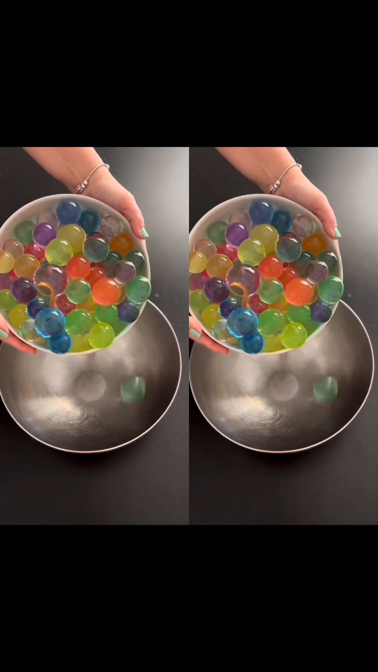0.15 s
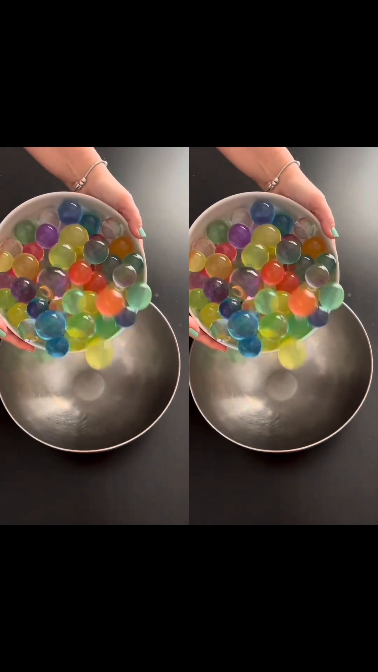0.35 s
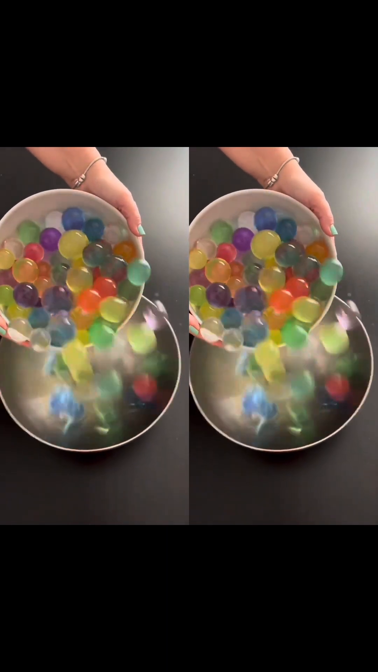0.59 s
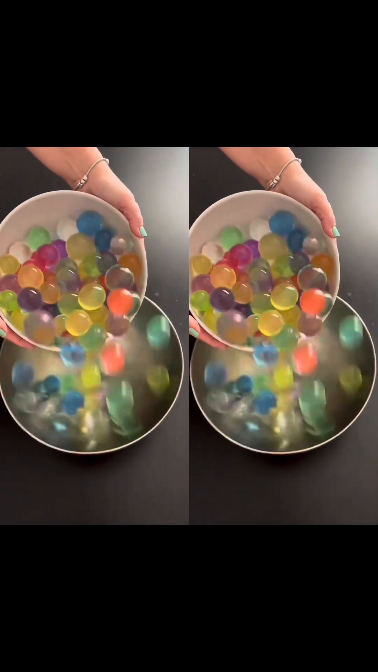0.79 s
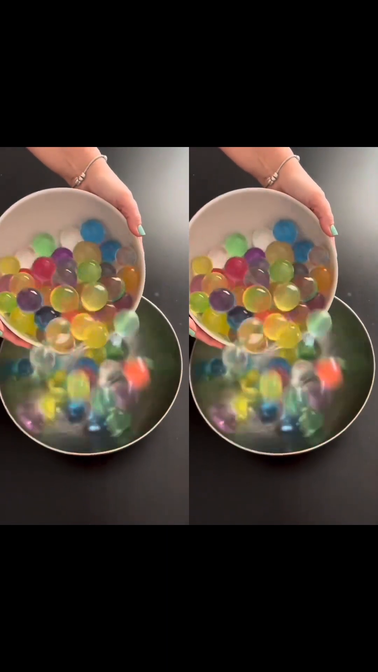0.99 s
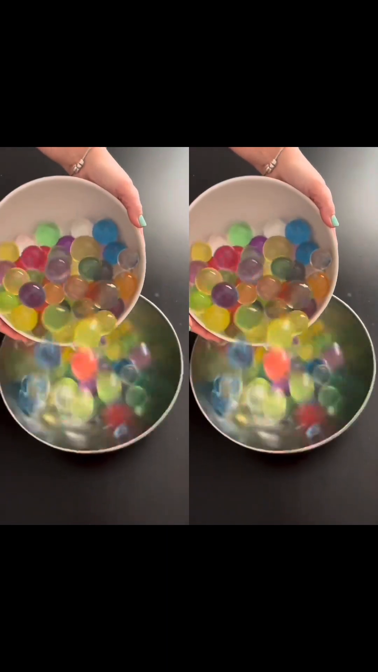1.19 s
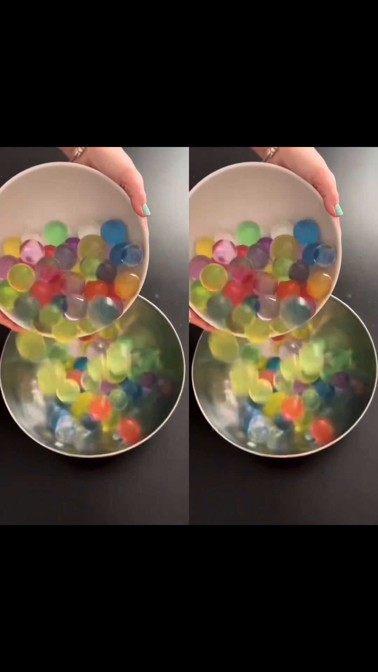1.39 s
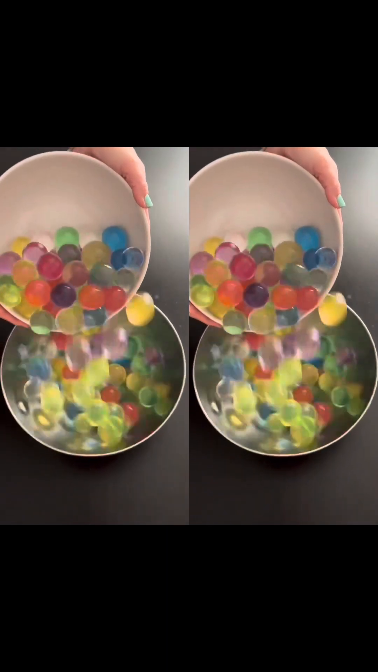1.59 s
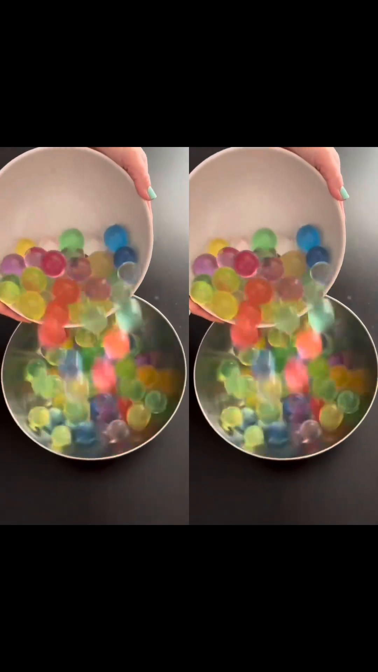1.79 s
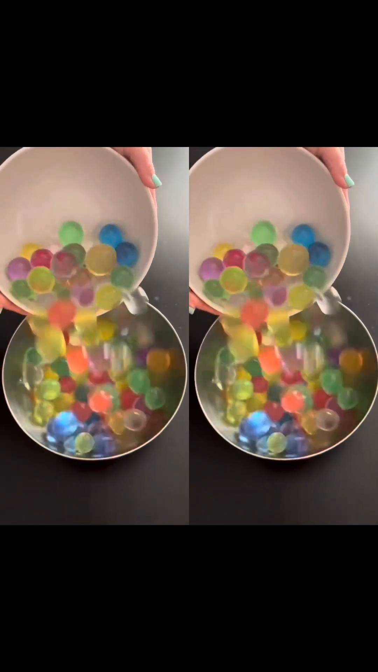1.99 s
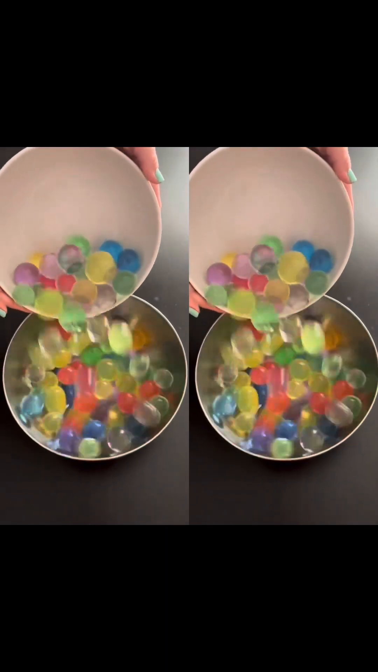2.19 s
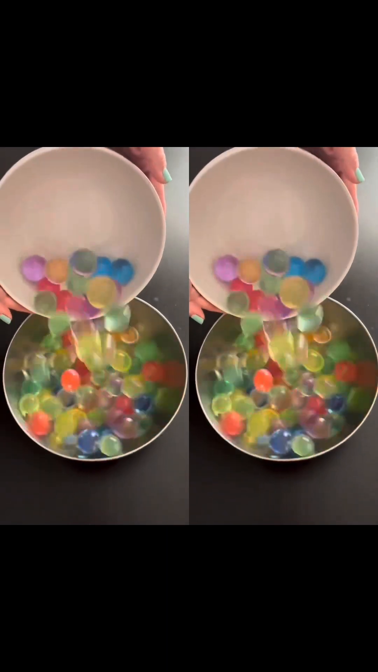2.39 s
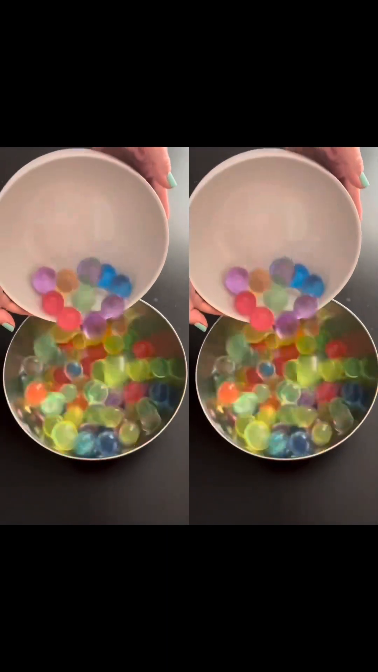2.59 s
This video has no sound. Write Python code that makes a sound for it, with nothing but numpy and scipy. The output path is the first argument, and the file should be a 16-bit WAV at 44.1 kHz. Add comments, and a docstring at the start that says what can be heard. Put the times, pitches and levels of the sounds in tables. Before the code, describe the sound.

Wet gel beads pour into a metal bowl on a table. After faint low hum, single soft thumps begin at 0.1 s. From 0.44 to 0.76 s the pouring bowl's rim rattles loudly on the metal in short, dry clanks. Dull low thuds, wet smacks and crisp patter continue to about 2.6 s, stronger near 1.24 and 1.45 s, with tiny pitched wet ticks from 1.3 s. Close stereo, small room.

```python
"""A faint room hum lies under soft wet gel beads pouring into a metal bowl on a table, in stereo.
From 0.1 s single beads thump or slap bowl and table as decaying modes, over a stream of light landings,
while wet smacks and patter (shaped noise) sound on top. From 0.44 to 0.76 s the pouring bowl's rim
chatters on the metal: clusters of taps excite rim modes. From 1.3 s a few pitched wet ticks appear.
Noise-tail reflections surround the sources, and two close microphone ports pick it all up."""
import sys
import numpy as np
from scipy import signal
from scipy.fft import rfft, irfft, next_fast_len
from scipy.io import wavfile

SR = 44100
rng = np.random.default_rng(int(sys.argv[2]) if len(sys.argv) > 2 else 0)


def unload_audio(sound):
    """Save the sound as a 16-bit wav file, at the path given as the first command line argument."""
    columns = np.transpose(np.atleast_2d(sound))
    # keep every value between -1 and 1, then stretch to whole-number steps
    steps = np.round(np.clip(columns, -1, 1) * 32767)
    wavfile.write(sys.argv[1], SR, steps.astype(np.int16))


N = 116865

# Noise spectrum of the room hum: f/Hz, relative level/dB
HUM_SPECTRUM = [(50, 10.5), (340, -8), (1400, -11.5), (2600, -55)]
# Knocks of the rim: t/s, peak level of the ring/dB, extra treble level/dB
RIM_KNOCKS = [(0.437, -6.5, -2), (0.485, -6.5, -7), (0.493, -11, -0.2), (0.506, -8, 2.5), (0.545, -3, -2.5),
              (0.573, -4.5, 2), (0.605, -13.5, -32), (0.687, -9, -3.1), (0.715, -4, 0), (0.722, -9, 3),
              (0.752, -6.5, 2), (0.763, -9.5, -11)]
# Ringing modes of rim and bowl wall: f/Hz, relative level/dB, t60/s
RIM_MODES = [(420, -7, 0.11), (592, -2, 0.04), (692, -2.5, 0.044), (892, 3.5, 0.031), (945, 9.5, 0.032),
             (1026, -1, 0.039), (1360, 4.5, 0.023), (1830, -5, .03), (2075, 2.5, 0.027), (2379, 5, 0.067),
             (3960, -3, 0.047), (5020, -7, 0.073)]
# Noise spectrum of the knocks' crack: f/Hz, gain/dB
CRACK_SPECTRUM = [(1500, -11.5), (3000, -8.5), (7000, -19.5), (15000, -30.5)]
# Strength of the stream of light beads: t/s, relative thump level/dB, relative wet hiss level/dB
STREAM_LEVELS = [(.1, -58, -72.5), (.4, -33, -77), (.5, -28.5, -48.5), (.95, -29, -47), (1.1, -35.5, -49.5),
                 (1.3, -32, -52.5), (2.101, -28, -54.5), (2.65, -36, -60)]
# Wet smacks: t/s, envelope level before colouring/dB, extra top-end level/dB
WET_SMACKS = [(0.097, -43.5, -5), (0.1942, -40.5, -32), (0.424, -29, -37), (0.8795, -29.5, -37.5),
              (1.0314, -35.5, -25), (1.138, -34.5, -3.5), (1.2218, -29, -10), (1.283, -31.5, -24),
              (1.6278, -27, -12), (1.7673, -27.5, -28), (2.0863, -36.5, -13), (2.2684, -40.5, 6.5),
              (2.4318, -30, -14)]
# Pitched wet ticks: t/s, envelope level/dB, f/Hz
WET_TICKS = [(1.301, -45, 2710), (1.463, -46, 4080), (2.089, -44.5, 4070), (2.513, -39, 3660),
             (2.5533, -46, 3530)]
# Colour of smacks and patter: f/Hz, gain/dB
WET_SPECTRUM = [(900, 11.5), (2500, -4), (4000, -1), (7000, -1), (10000, 0), (14000, 5.5)]
# Single landings, heavy thumps and light slaps:
# t/s, peak level of the ring/dB, extra level of upper modes and slap/dB
SINGLE_LANDINGS = [(0.1, -34, 0.5), (0.194, -22.5, -2), (0.268, -21, -7), (0.394, -29, 2), (0.552, -15, 5),
                   (0.748, -20.5, -6), (0.83, -21, 2.5), (0.949, -24, -4.5), (1.142, -18.5, -5.5),
                   (1.177, -17, -2), (1.238, -13.5, 4), (1.339, -23, 0), (1.429, -32.5, 13),
                   (1.454, -13.5, 2.5), (1.572, -24, 3), (1.687, -24, 4.5), (1.91, -18.5, 1.5),
                   (1.986, -25.5, 7), (2.043, -24.5, 7), (2.074, -30, 9.5), (2.221, -17.5, -1),
                   (2.233, -27, 11), (2.271, -26.5, 10), (2.338, -24.5, -2)]
# Ringing modes of bowl and table: f/Hz, relative level/dB
BODY_MODES = [(105, -10), (135, -1.5), (160, -7), (246, -0.5), (285, -4), (336, -9), (450, -10.5),
              (598, -11.5)]
# Phase lead between the two ports, before the bass is made alike: f/Hz, phase/rad
PORT_LEAD = [(300, -.7), (1200, -.8), (2700, 2.6), (5000, 1.2), (7240, 6.2)]
# Level difference between the two ports, before the bass is made alike: f/Hz, level/dB
PORT_TILT = [(400, 0.5), (1000, -5.5), (2200, -0.5)]

HUM_RMS_DB = -60.5
ROOM_DB, ROOM_T60_S = -8, 0.3
APART = 1  # strength of each port's own tail against the shared one
SPOT_DB = 4  # spread of the mode levels from one contact spot to the next
CHATTER_PER_S, CHATTER_S = 1500, 0.0069  # tap rate and length of one knock's chatter
TREBLE_FROM_HZ, CRACK_T60_S = 1800, 0.038
SMACKS_PER_S, SMACK_SPREAD_DB = 600, 4.5  # small ticks of the patter
SMOOTH_DB = -6  # smooth hiss against the ticks
SMACK_T60_S, SPRAY_T60_S, SPRAY_DB = 0.028, 0.15, -27
TOP_T60_S, TICK_T60_S = 0.019, 0.043
LANDINGS_PER_S, LANDING_MS, LANDING_SPREAD_DB = 170, 1.624, 3  # light beads; contact time of all
LANDING_SPOTS = 24
UPPER_FROM_HZ = 265  # splits the body modes into low and upper
BODY_T60_S, SWELL_S, DETUNE = 0.26, 0.02, 0.013  # low modes: t60 at 135 Hz, rise, relative spread
UPPER_T60_S, UPPER_DETUNE = 0.07, 0.08  # upper modes: t60, relative spread
SLAP_DB, SLAP_T60_S = -13.5, 0.022  # flat slap of a bead on the wall
TABLE_HZ, TABLE_T60_S, TABLE_DB = 50.04, 0.56, -5  # sway of the table top
PORT_HZ, PORT_WIDTH_HZ, PORT_DB = 5235, 858, 12.5  # resonance of the ports, added to all they pick up
ALIKE_HZ = 333  # the ports grow alike below this
LOW_CUT_HZ, EDGE_HZ = 42.6, 15750


def amp(db):
    """Decibels to amplitude."""
    return 10 ** (np.asarray(db) / 20)


def evened(x):
    """Scales a sound to an RMS of one."""
    return x / np.sqrt(np.mean(x ** 2) + 1e-20)


def decay(t, t60):
    """Exponential fade that falls 60 dB in t60 seconds."""
    return amp(-60 * t / t60)


def seconds(length):
    """Time axis in seconds."""
    return np.arange(round(length * SR)) / SR


def read(points, hz):
    """Reads a curve along a logarithmic frequency axis."""
    f, value = np.transpose(points)
    return np.interp(np.log(hz + 1), np.log(f + 1), value)


def add(mix, s, sound):
    """Lays a sound into the mix at s seconds, cut off at the end."""
    part = mix[round(s * SR):][:len(sound)]
    part += sound[:len(part)]


def coloured(x, points):
    """Shapes the spectrum of a full-length sound."""
    gain = amp(read(points, np.fft.rfftfreq(N, 1 / SR)))
    return irfft(rfft(x) * gain, N)


def band(x, lo_hz, hi_hz):
    """Keeps the range between two frequencies."""
    sos = signal.butter(2, [lo_hz, hi_hz], "band", fs=SR, output="sos")
    return signal.sosfilt(sos, x)


def ring(hz, db, t60, length):
    """Modes of a struck body: one dying sine per row."""
    t = seconds(length)
    envelopes = amp(db[:, None] - 60 * t / t60[:, None])
    return envelopes * np.sin(2 * np.pi * hz[:, None] * t)


def shower(per_s, spread_db):
    """Random contacts as single-sample clicks, a few of them large."""
    sizes = amp(spread_db * np.minimum(rng.exponential(1, N), 4))
    return sizes * (rng.random(N) < per_s / SR)


def signs():
    """Random polarity for every sample."""
    return rng.choice([-1, 1], N)


def stream(axis):
    """Level of the stream of beads, silent before the first single landing."""
    table, t = np.array(STREAM_LEVELS), np.arange(N) / SR
    level = amp(np.interp(t, table[:, 0], table[:, axis]))
    return level * (t > SINGLE_LANDINGS[0][0])


def hum():
    """Steady room hum made of noise weighted to the bass."""
    return amp(HUM_RMS_DB) * evened(coloured(rng.standard_normal(N), HUM_SPECTRUM))


def room(x):
    """Reflections: a dying noise tail without bass and duller on top, partly different at each port."""
    t = seconds(0.4)
    shared, first, second = rng.standard_normal((3, len(t)))
    noise = shared + APART * np.array([first, second])
    tail = band(noise * decay(t, ROOM_T60_S) * (t > 0.004), 327, 13300)
    tail /= np.linalg.norm(tail[0])
    return amp(ROOM_DB) * signal.fftconvolve(x[None], tail, axes=1)[:, :N]


def knocks():
    """Each knock is a quick chatter of hard contacts that rings split pairs of rim modes and cracks."""
    out, crack, size = np.zeros(N), np.zeros(N), round(CHATTER_S * SR)
    hz, level_db, t60 = np.transpose(RIM_MODES + RIM_MODES)  # each mode twice, detuned apart below
    spots = rng.standard_normal((len(RIM_KNOCKS), 2, len(hz)))
    taps = shower(CHATTER_PER_S, 2.07) * signs()
    t = seconds(0.1)
    for (s, db, treble_db), (pitch_shift, level_shift) in zip(RIM_KNOCKS, spots):
        # one sure first contact, then a swelling and fading run of taps
        drive = taps[round(s * SR):][:size] * np.hanning(size) + signal.unit_impulse(size)
        mode_db = level_db + (hz > TREBLE_FROM_HZ) * treble_db + SPOT_DB * level_shift
        modes = ring(hz * (1 + 0.025 * pitch_shift), mode_db, t60, 0.12)
        sound = signal.oaconvolve(modes.sum(0), drive)
        add(out, s, amp(db) * sound / abs(sound).max())
        fade = decay(np.maximum(t - CHATTER_S, 0), CRACK_T60_S)
        add(crack, s, np.minimum(t / 0.0056, 1) * amp(db + treble_db) * fade)
    return out + coloured(crack * rng.standard_normal(N), CRACK_SPECTRUM)


def patter():
    """Small wet ticks, each a short noisy ring in one of 36 pitch bands, over a smooth hiss."""
    clicks, kind = shower(SMACKS_PER_S, SMACK_SPREAD_DB), rng.integers(0, 36, N)
    t, out = seconds(0.045), np.zeros(N)
    for k, hz in enumerate(np.geomspace(1400, 13000, num=36)):
        width = rng.uniform(0.03, 0.2) * (hz / 3500) ** 1.1
        t60 = rng.uniform(0.01, 0.045)
        tick = band(rng.standard_normal(len(t)), hz / (1 + width), min(hz * (1 + width), SR / 2.2))
        tick = evened(tick * np.minimum(t / 0.0013, 1) * decay(t, t60))
        tick *= (hz / 4000) ** 0.53  # higher ticks are stronger
        out += signal.oaconvolve(clicks * (kind == k), tick)[:N]
    hiss = amp(SMOOTH_DB) * rng.standard_normal(N)
    return (evened(out) + hiss) * stream(axis=2)


def pitched_ticks():
    """Wet ticks with a clear pitch: short dying sines with a soft start."""
    out, t = np.zeros(N), seconds(0.3)
    for s, db, hz in WET_TICKS:
        envelope = np.minimum(t / 0.0019, 1) * amp(db) * decay(t, TICK_T60_S)
        add(out, s, envelope * np.sin(2 * np.pi * hz * t))
    return out


def smacks():
    """Bursts of wet mid-treble noise with a spray tail and a thin top click, over patter and ticks."""
    t = seconds(0.3)
    spray = amp(SPRAY_DB) * decay(t, SPRAY_T60_S)
    burst = np.minimum(t / 0.0015, 1) * (decay(t, SMACK_T60_S) + spray)
    level, top = np.zeros(N), np.zeros(N)
    for s, db, top_db in WET_SMACKS:
        add(level, s, amp(db) * burst)
        add(top, s, amp(db + top_db) * decay(t, TOP_T60_S))
    mid, high = rng.standard_normal((2, N))
    body = band(level * mid, 2520, 8100) + 0.32 * level * mid
    top_clicks = amp(8.5) * band(top * high, 8300, 21000)
    return pitched_ticks() + coloured(body + patter(), WET_SPECTRUM) + top_clicks


def push(ms):
    """Force of a soft ball while it touches: a smooth rise and fall."""
    return np.hanning(round(ms * SR / 1000) + 2)


def thump(upper_db, spot):
    """One landing: a soft push rings the body modes, shifted by the spot, with a flat slap on top."""
    hz, db = np.transpose(BODY_MODES)
    upper, t = hz > UPPER_FROM_HZ, seconds(0.4)
    pitch_shift, level_shift = spot
    mode_hz = hz * (1 + np.where(upper, UPPER_DETUNE, DETUNE) * pitch_shift)
    mode_db = db + upper * upper_db + SPOT_DB * level_shift
    t60 = np.where(upper, UPPER_T60_S, BODY_T60_S * 135 / hz)
    modes = ring(mode_hz, mode_db, t60, 0.4)
    swell = 1 - np.exp(-t / SWELL_S)  # only the low modes build up slowly
    sound = modes[upper].sum(0) + swell * modes[~upper].sum(0)
    sound = signal.oaconvolve(sound, push(LANDING_MS))[:len(t)]
    slap_noise = band(rng.standard_normal(len(t)), 700, 2300)
    slap = amp(SLAP_DB + upper_db) * decay(t, SLAP_T60_S) * slap_noise
    return sound / abs(sound).max() + slap


def table_sway(force):
    """The table top sways as one slow mode, driven by every landing."""
    t = seconds(0.5)
    envelope = (1 - np.exp(-t / 0.033)) * amp(TABLE_DB) * decay(t, TABLE_T60_S)
    return signal.oaconvolve(force, envelope * np.sin(2 * np.pi * TABLE_HZ * t))[:N]


def thumps():
    """Single beads thump or slap over a stream of light landings; all of them keep the table swaying."""
    out, force = np.zeros(N), np.zeros(N)
    single_spots = rng.standard_normal((len(SINGLE_LANDINGS), 2, len(BODY_MODES)))
    for (s, db, upper_db), spot in zip(SINGLE_LANDINGS, single_spots):
        add(out, s, amp(db) * thump(upper_db, spot))
        add(force, s, amp([db]))
    clicks = shower(LANDINGS_PER_S, LANDING_SPREAD_DB) * signs()
    hits = amp(-8.5) * clicks * stream(axis=1)
    place = rng.integers(0, LANDING_SPOTS, N)
    stream_spots = rng.standard_normal((LANDING_SPOTS, 2, len(BODY_MODES)))
    for k, spot in enumerate(stream_spots):
        out += signal.oaconvolve(hits * (place == k), thump(-1.74, spot))[:N]
    return out + table_sway(hits + 0.64 * force)


def scene():
    """All sources with their reflections, over the hum."""
    near = knocks() + smacks() + thumps()
    return near + room(near) + hum()


def record(dry):
    """Low cut, port resonance, phase and level difference of the two ports, clipping and band limit."""
    size = next_fast_len(N + 4096)
    hz = np.fft.rfftfreq(size, 1 / SR)
    side = np.array([[0.5], [-0.5]]) * (1 - np.exp(-(hz / ALIKE_HZ) ** 2))  # half to each port
    resonance = 1 + amp(PORT_DB) / (1 + 2j * (hz - PORT_HZ) / PORT_WIDTH_HZ)
    level = amp(side * read(PORT_TILT, hz))
    phase = np.exp(1j * side * np.interp(hz, *np.transpose(PORT_LEAD)))
    low_cut = signal.butter(4, LOW_CUT_HZ, "high", fs=SR, output="sos")
    spectrum = rfft(signal.sosfilt(low_cut, dry), size)
    heard = irfft(spectrum * resonance * level * phase, size)[:, :N]
    band_limit = signal.firwin(255, EDGE_HZ, window=("kaiser", 9), fs=SR)
    return signal.oaconvolve(np.clip(heard, -1, 1), band_limit[None], "same")


dry = scene()
out = record(dry)
unload_audio(out)
```